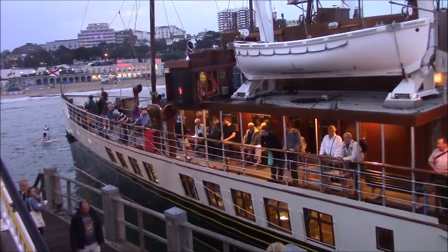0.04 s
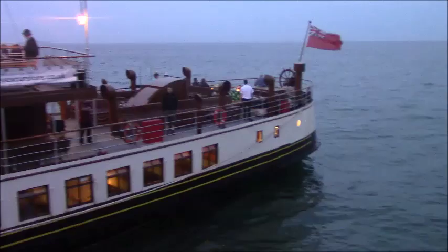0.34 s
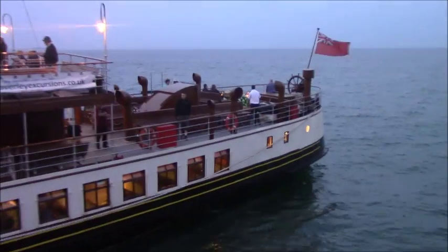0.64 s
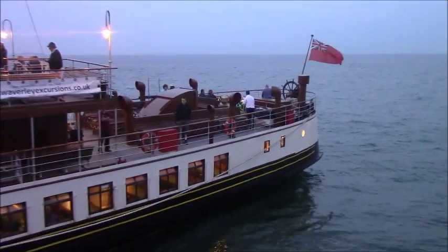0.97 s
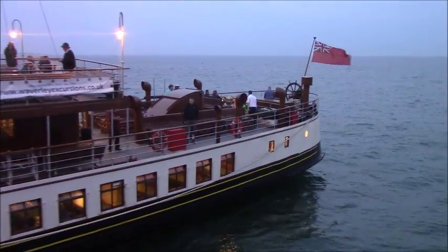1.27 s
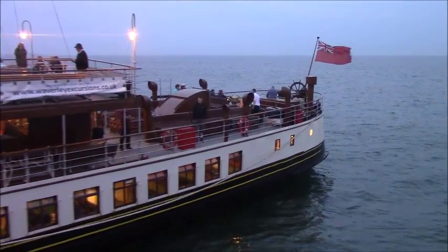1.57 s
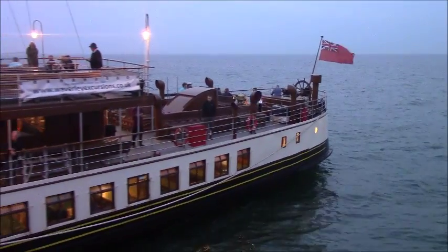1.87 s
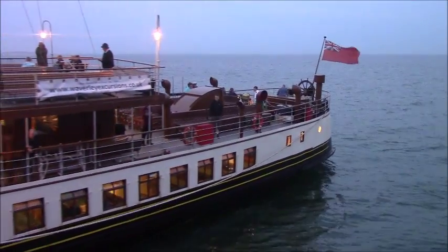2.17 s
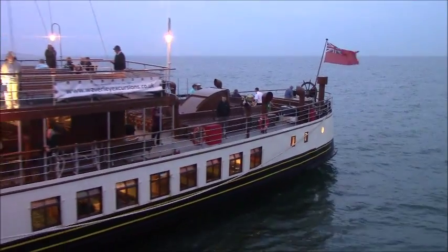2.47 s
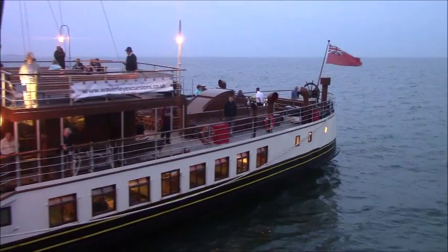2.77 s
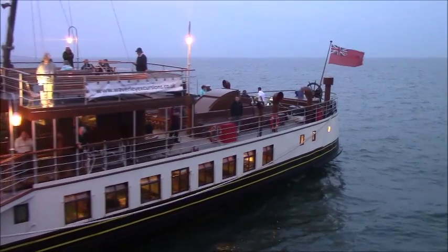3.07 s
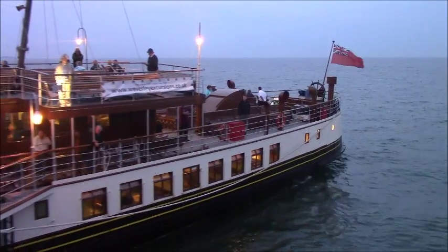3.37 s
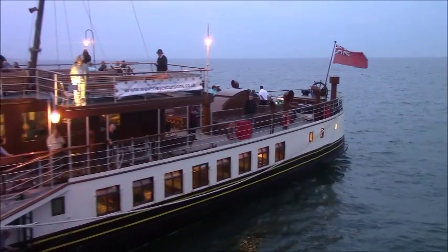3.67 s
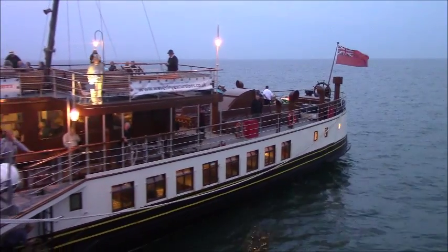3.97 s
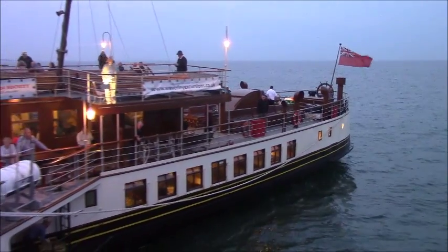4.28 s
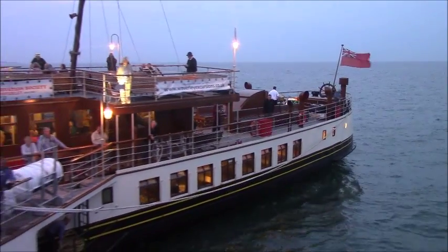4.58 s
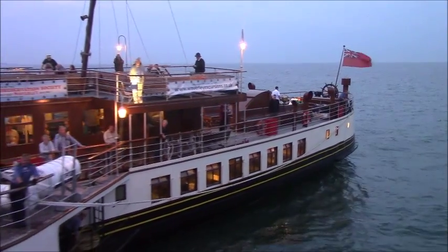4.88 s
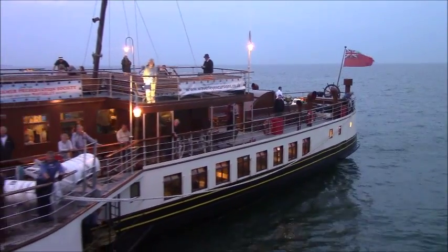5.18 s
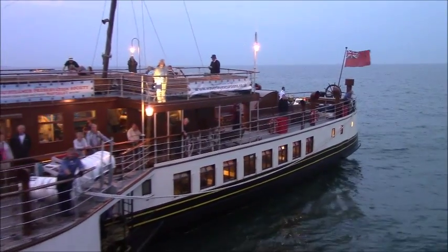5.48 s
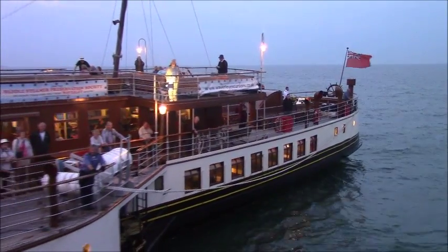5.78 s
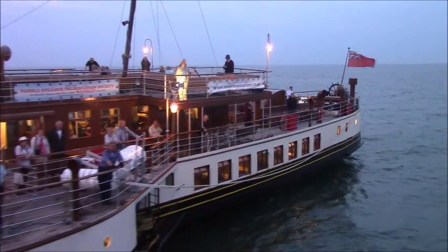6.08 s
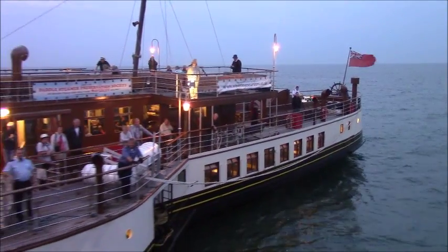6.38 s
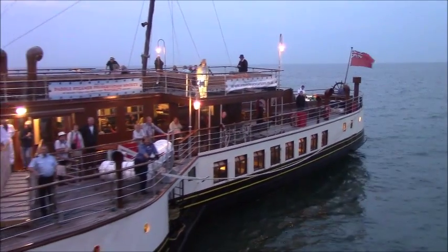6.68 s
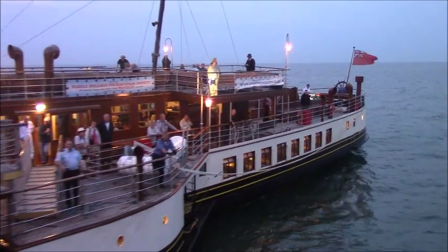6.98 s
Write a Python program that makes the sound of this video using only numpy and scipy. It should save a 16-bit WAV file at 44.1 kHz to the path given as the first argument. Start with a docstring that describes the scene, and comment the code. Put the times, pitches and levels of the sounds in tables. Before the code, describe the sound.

Out on the sea, a paddle steamer's wheel is first a short, muffled wash, cut by a tiny gap. Closer now, its paddles beat the water in a quick, even rhythm of hissing spray and bubbling churn. The wash swells and brightens as the wheel approaches and gains a little speed, and sharp slaps of water break through. A breeze thumps lightly on the microphone early on, then gusts more strongly toward the end.

```python
"""A brief, dull rush comes first: a paddle steamer's wheel, heard far off from the bow.
After a moment of silence the handheld microphone is nearer the wheel as the boat leaves the pier.
Three times a second a paddle float hits the sea: spray hisses, then churned water roars and bubbles.
The wheel gathers speed and draws closer, and its hard slaps stand out.
A breeze buffets the microphone, hardest near the end."""
import sys
import numpy as np
from scipy import signal
from scipy.fft import rfft, irfft, next_fast_len
from scipy.io import wavfile
from scipy.ndimage import uniform_filter1d

SR = 44100
rng = np.random.default_rng(int(sys.argv[2]) if len(sys.argv) > 2 else 0)


def inscribe(sig):
    """Save sig as 16-bit PCM at rate SR to the path in sys.argv[1].

    A 1-D sig is mono; a 2-D sig holds one channel per row.
    Samples are clipped to [-1, 1] before scaling.
    """
    pcm = np.round(np.clip(np.atleast_2d(sig).T, -1, 1) * 32767)
    wavfile.write(sys.argv[1], SR, pcm.astype(np.int16))


N = 314874
T = np.arange(N) / SR
FAR_END_S, NEAR_START_S = 0.2285, 0.3688  # silence lies between the two microphone positions

# The wheel from the bow, wind on the microphone, then spray and churned water from close by.
# Each row: frequency in Hz, relative level in dB.
FAR_WASH_SPECTRUM = [(30, -28), (60, -22), (130, 2), (400, 2.5), (650, -4.5), (2200, -5), (3300, -11),
                     (6500, -19.5), (10000, -29.5), (15500, -41)]
WIND_SPECTRUM = [(20, -30), (50, -30), (80, -16.5), (130, -0.5), (210, 2), (380, -3.5), (650, -19),
                 (1500, -35), (5000, -60)]
SPRAY_SPECTRUM = [(300, -33.5), (900, -11.5), (1800, -3.5), (3000, 0.5), (4300, -0.4), (6500, -4),
                  (10000, -9.5), (12500, -15), (15700, -23)]
CHURN_SPECTRUM = [(60, -44), (130, -20), (220, -7), (320, -2), (410, -1.25), (540, -4), (760, -1),
                  (1200, -0.85), (2000, -2), (3000, -4.5), (4500, -13), (8000, -26.5), (16000, -50)]
# The breeze drops, then freshens. Each row: time in seconds, level in dB.
BREEZE_LEVELS = [(0.1, -49.8), (1.8, -48), (2.2, -52), (4.4, -53.5), (4.9, -46), (5.7, -42.3), (6.5, -33.5),
                 (7.14, -32.5)]
# Wind buffets. Each row: peak time in seconds, level in dB, centre in Hz, width in seconds.
BUFFETS = [(0.025, -34.5, 230, .014), (0.102, -32, 240, .008), (0.18, -34.5, 225, .014),
           (0.803, -29.5, 260, .009), (1.27, -35.5, 360, .04), (1.6, -35.5, 280, .026),
           (1.92, -33.5, 330, .035), (6.275, -22, 270, .023), (6.352, -23.5, 320, .012),
           (6.497, -23, 240, .007), (6.58, -17, 300, .012), (6.635, -19.5, 272, .03),
           (6.966, -21.5, 380, .008)]
# The wash between strokes, growing as the wheel nears.
# Each row: time in seconds, churn level in dB, spray level in dB.
WASH_LEVELS = [(0.4, -32.3, -39), (1.3, -32.1, -36.6), (2.6, -31.8, -35.7), (3.05, -30.7, -33.3),
               (4.05, -30.5, -33.3), (4.6, -26.9, -29.4), (4.9, -24.1, -26), (5.7, -21.7, -24.8),
               (7.14, -21, -25.3)]
# Paddle strokes. Each row: start in seconds, surge of the spray in dB, swell of the churn in dB.
STROKES = [(0.424, 6.2, 3.2), (0.785, 4, 3.4), (1.135, 4.1, 4.7), (1.46, 5, 4.7), (1.796, 5.5, 5.1),
           (2.13, 7, 6.1), (2.456, 7.2, 4.1), (2.762, 5.6, 3.1), (3.1, 5.1, 3.1), (3.437, 4, 4.7),
           (3.747, 4.1, 4), (4.09, 4.5, 3.9), (4.368, 2.8, 1.9), (4.705, 4.3, 6.1), (5.016, 3.6, 4.9),
           (5.312, 3.5, 4.3), (5.618, 2.8, 4.8), (5.92, 2.6, 3.9), (6.193, 1.3, 4.6), (6.498, 2.5, 3.7),
           (6.815, 1.8, 3.8)]
# The microphone turns towards the wheel. Each row: time in seconds, share of the turn from 0 to 1.
MIC_TURN = [(5.2, 0), (6.5, 1)]
# Its treble once fully turned. Each row: frequency in Hz, gain in dB.
TURNED_COLOUR = [(3400, 0), (4500, -3), (5400, 1.5), (6200, .3), (7200, 2.5), (8600, 0), (10500, 0),
                 (15000, 3)]
# Hard slaps of water. Each row: start in seconds, level in dB, centre in Hz.
SLAPS = [(0.897, -26.5, 1050), (2.52, -26.5, 3200), (3.478, -25.5, 2920), (3.813, -14.6, 1900),
         (4.135, -24.5, 1700), (4.457, -15.2, 1900), (4.776, -17, 2100), (5.694, -14.5, 1290),
         (5.975, -14, 1900), (6.27, -18, 1800), (6.889, -15, 1400)]
# How alike the microphone's two ports sound. Each row: frequency in Hz, likeness from 0 to 1.
PORT_LIKENESS = [(1800, 1), (2900, 1), (3600, 1), (5200, 0.84), (6500, 0.84), (8600, 0.65), (10000, 0.82),
                 (12000, 0.58), (15000, 0.52)]
# Their balance. Each row: frequency in Hz, left minus right in dB.
PORT_BALANCE = [(3200, 0), (4000, -1), (4900, -3.5), (5800, -.2), (8100, 0), (9200, 5.6), (10700, 2.6),
                (13000, 2.2), (15500, .5)]
# Their phase. Each row: frequency in Hz, lead of the left port in radians.
PORT_LEAD = [(3200, 0), (4570, 0.15), (5340, .6), (7490, .4), (8610, 1.0), (9700, 0.35), (11000, 0.58),
             (14100, 0.27)]
# The colour they share. Each row: frequency in Hz, gain in dB.
PORT_COLOUR = [(3200, 0), (4400, -0.5), (5300, -4.5), (6300, 2), (7700, .5), (8600, -1.5), (10000, 2),
               (11500, 0.5)]


def amp(db):
    """Decibels to gain."""
    return 10 ** (np.asarray(db) / 20)


def unit(x):
    """Scales to rms 1."""
    return x / np.sqrt(np.mean(x ** 2) + 1e-20)


def at_hz(points, hz):
    """Reads a table on a log-frequency axis."""
    knots_hz, values = np.transpose(points)
    return np.interp(np.log(hz + 1), np.log(knots_hz + 1), values)


def curve(rows, column=1):
    """One column of a time table, at every sample."""
    rows = np.asarray(rows)
    return np.interp(T, rows[:, 0], rows[:, column])


def colour(x, spectrum):
    """Filters a sound by a table of Hz and dB."""
    size = next_fast_len(N + 4096)
    gain = amp(at_hz(spectrum, np.fft.rfftfreq(size, 1 / SR)))
    return irfft(rfft(x, size) * gain, size)[..., :N]


def patchy_noise(spectrum, patch_db, flicker_db, patch_size, tilt_db=0):
    """Two noises sharing patches (frames by bins), a broad flicker and a tilt per octave above 7 kHz."""
    hz, t, cells = signal.stft(rng.standard_normal((2, N)), SR, nperseg=256, noverlap=192)
    patches, flicker = rng.standard_normal((2, len(hz), len(t)))
    frames, bins = patch_size
    patches = unit(uniform_filter1d(uniform_filter1d(patches, frames, axis=1), bins, axis=0))
    flicker = unit(uniform_filter1d(uniform_filter1d(flicker, size=12, axis=1), size=60, axis=0))
    tilt = np.log2(np.maximum(hz / 7000, 1))[:, None] * np.interp(t, T, tilt_db * np.ones(N))
    cells *= amp(patch_db * patches + flicker_db * flicker + tilt)
    _, noise = signal.istft(cells, SR, nperseg=256, noverlap=192)
    return unit(colour(noise[:, :N], spectrum))


def band_noise(hz, q):
    """Half a second of two noises in one broad resonance."""
    b, a = signal.iirpeak(hz, q, fs=SR)
    white = rng.standard_normal((2, SR))
    return unit(signal.lfilter(b, a, signal.lfilter(b, a, white)))[:, SR // 2:]


def grains(low_hz, high_hz, per_s, cycles, spread_db, rise, pitches):
    """A shower of tiny damped rings of uneven size, each rising in pitch as it dies."""
    out, tries = np.zeros((2, N)), 1500
    odds = per_s * N / SR / pitches / tries
    for hz in np.geomspace(low_hz, high_hz, pitches):
        age = np.arange(int(5 * cycles / hz * SR) + 2) * hz / (cycles * SR)  # in decay times
        phase = 2 * np.pi * cycles * age * (1 + rise * age / 2)
        ring = np.sin(phase) * np.exp(-age) * (1 - np.exp(-6 * age))
        when, chance, weight = rng.random((3, 2, tries))
        sizes = amp(spread_db * np.minimum(-np.log(weight + 1e-9), 4)) * (chance < odds)
        for side in range(2):
            births = np.bincount((when[side] * N).astype(int), sizes[side], N)
            out[side] += signal.oaconvolve(births, unit(ring) / np.sqrt(len(ring)))[:N]
    return unit(out)


def add(mix, start_s, sound):
    """Adds a sound to the mix at a time."""
    part = mix[:, round(start_s * SR):][:, :sound.shape[1]]
    part += sound[:, :part.shape[1]]


def surge(start_s, length_s, rise_s):
    """A quick, rounded start, then a smooth fall; its top is 1."""
    age = np.maximum(T - start_s, 0)
    shape = (1 - np.exp(-age / rise_s)) * np.exp(-(age / length_s) ** 2)
    rounded = uniform_filter1d(shape, size=SR // 28)
    return rounded / rounded.max()


def swell(peak_s, width_s):
    """A rounded hump that sinks more slowly than it rises."""
    offset = (T - peak_s) / width_s
    return np.exp(-np.where(offset < 0, offset, offset / 1.5) ** 2)


def far_wash():
    """From the bow the distant wheel is a dull, even rush."""
    return amp(-35) * patchy_noise(FAR_WASH_SPECTRUM, patch_db=1.5, flicker_db=1, patch_size=(16, 4))


def wind():
    """Lumpy turbulence right on the microphone, with separate buffets."""
    buffets, t = np.zeros((2, N)), np.arange(SR // 2) / SR
    for peak_s, db, hz, width_s in BUFFETS:
        start_s = max(peak_s - 3 * width_s, 0)
        shape = np.exp(-((t + start_s - peak_s) / width_s) ** 2 / 2)
        puff = band_noise(hz, q=0.78) * shape
        puff *= np.linalg.norm(shape) / np.linalg.norm(puff, axis=1, keepdims=True)
        add(buffets, start_s, amp(db) * puff)
    buffets = colour(buffets, [(40, -16), (80, -6), (150, 0.5)])  # the microphone passes little deep bass
    breeze = patchy_noise(WIND_SPECTRUM, patch_db=1, flicker_db=0.5, patch_size=(20, 3))
    return amp(curve(BREEZE_LEVELS)) * breeze + buffets


def spray():
    """Water flung off each float hisses and patters; the hiss brightens as the wheel nears."""
    steady_db = curve(WASH_LEVELS, column=2)
    surges_db = sum(db * surge(s, length_s=.116, rise_s=.038) for s, db, _ in STROKES)
    tilt_db = 0.27 * (steady_db + 28)
    hiss = patchy_noise(SPRAY_SPECTRUM, patch_db=1, flicker_db=0.2, patch_size=(10, 7), tilt_db=tilt_db)
    drops = grains(1770, 13000, per_s=2520, cycles=1.4, spread_db=2.5, rise=0.017, pitches=12)
    drops = unit(colour(drops, SPRAY_SPECTRUM))
    water = amp(steady_db + surges_db) * (amp(3) * hiss + amp(-3.5) * drops)
    return water + curve(MIC_TURN) * (colour(water, TURNED_COLOUR) - water)


def churn():
    """Each float drives air under water: a roar with bubbles, whose deep gush comes last."""
    lag_s, lag_shrink = .145, .007  # the swell follows sooner as the wheel gathers speed
    swells_db = sum(db * swell(s + lag_s - lag_shrink * s, width_s=.064) for s, _, db in STROKES)
    level_db = curve(WASH_LEVELS, column=1) + swells_db
    roar = patchy_noise(CHURN_SPECTRUM, patch_db=1.56, flicker_db=0.55, patch_size=(12, 4))
    bubbles = grains(279.9, 3200, per_s=1400, cycles=5.13, spread_db=3.2, rise=.04, pitches=32)
    water = roar + amp(-6.5) * unit(colour(bubbles, CHURN_SPECTRUM))
    gush = colour(water, [(650, 0), (1300, -7), (3000, -25)])
    early = amp(np.interp(T + .0053, T, level_db))
    late = amp(np.interp(T - .012, T, level_db))  # the large bubbles take longer to form
    return early * (water - gush) + late * gush


def slaps():
    """A sheet of water lands flat: a sharp crack as it closes on the sea, then a short scatter."""
    out, t = np.zeros((2, N)), np.arange(SR // 2) / SR
    rise_s, decay_s, scatter_s = .0015, .011, .04
    splash = (1 - np.exp(-t / rise_s)) * (np.exp(-t / decay_s) + .14 * np.exp(-t / scatter_s))
    crack = amp(-6) * np.exp(-abs(t - .004) / .0004)  # a spike 4 ms in
    for start_s, db, hz in SLAPS:
        add(out, start_s, amp(db) * band_noise(hz, q=0.52) * (splash + crack))
    return out


def microphone_ports(pair):
    """Two ports hear exactly the same bass, but differing treble."""
    size = next_fast_len(N + 4096)
    hz = np.fft.rfftfreq(size, 1 / SR)
    common, other = rfft(pair, size)
    likeness = at_hz(PORT_LIKENESS, hz)
    mid = common * np.sqrt((1 + likeness) / 2)
    side = other * np.sqrt((1 - likeness) / 2)
    lean = amp(at_hz(PORT_BALANCE, hz) / 2) * np.exp(1j * at_hz(PORT_LEAD, hz) / 2)
    return irfft(np.array([(mid + side) * lean, (mid - side) / lean]), size)[:, :N]


def scene():
    """The wheel from the bow, then from close by, with wind on the microphone in both places."""
    at_bow = T < (FAR_END_S + NEAR_START_S) / 2
    water = np.where(at_bow, far_wash(), churn() + spray() + slaps())
    return microphone_ports(water + wind())


def record(dry):
    """The ports' colour, the silence between the two positions, and a cut of the highest treble."""
    running = (T < FAR_END_S) | (T > NEAR_START_S)
    sound = colour(dry, PORT_COLOUR) * running
    lowpass = signal.firwin(611, cutoff=15780, window=("kaiser", 9), fs=SR)
    return signal.oaconvolve(sound, lowpass[None], "same")


dry = scene()
out = record(dry)
inscribe(out)
```